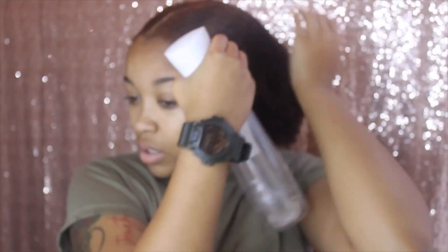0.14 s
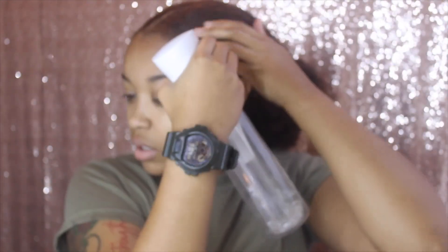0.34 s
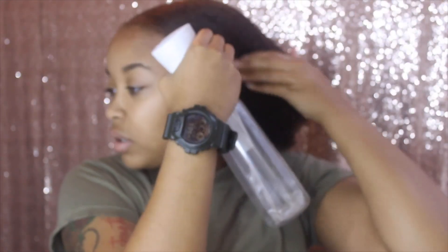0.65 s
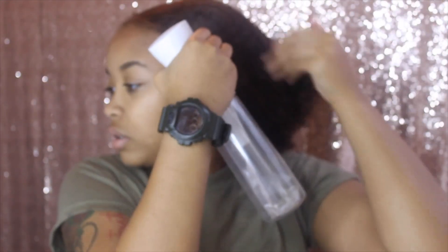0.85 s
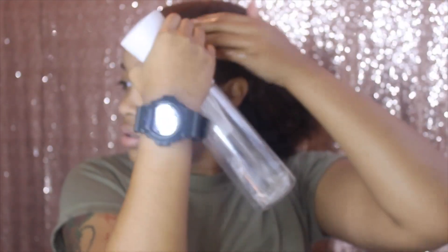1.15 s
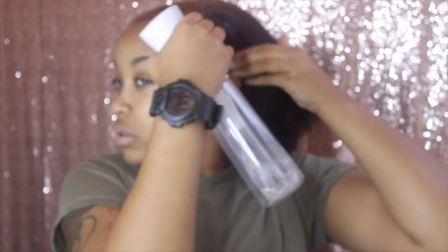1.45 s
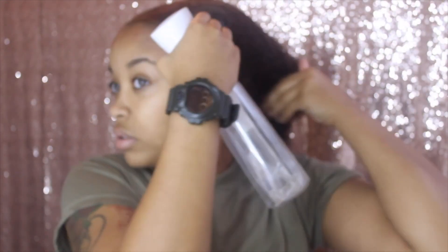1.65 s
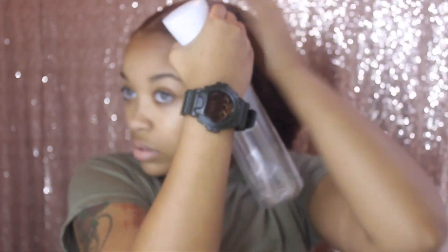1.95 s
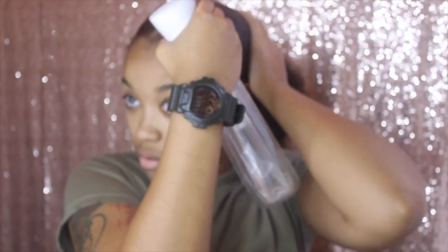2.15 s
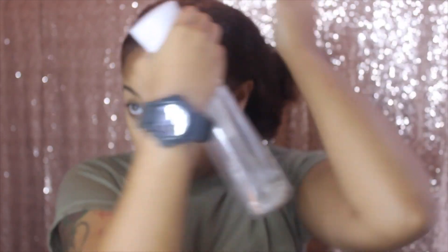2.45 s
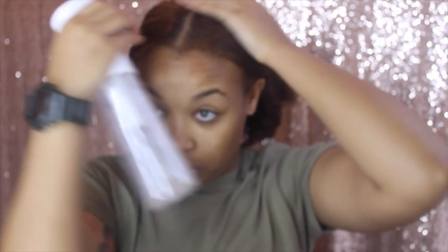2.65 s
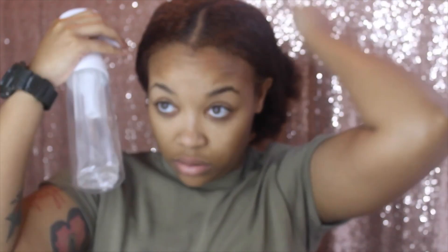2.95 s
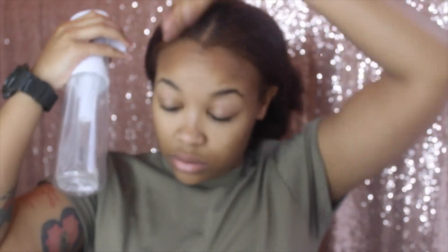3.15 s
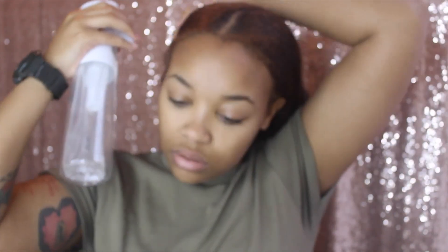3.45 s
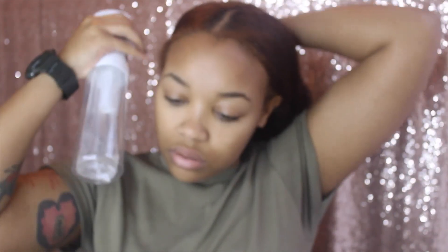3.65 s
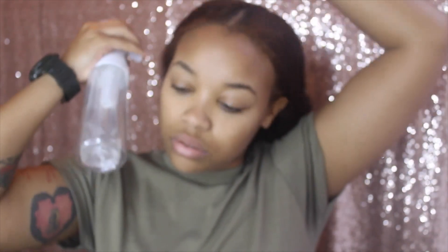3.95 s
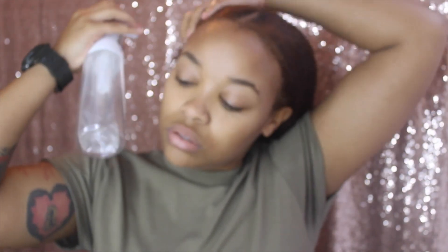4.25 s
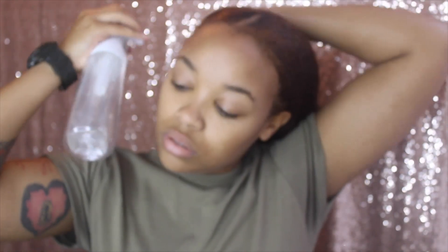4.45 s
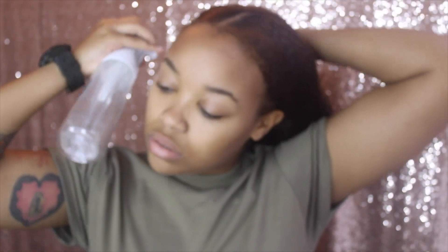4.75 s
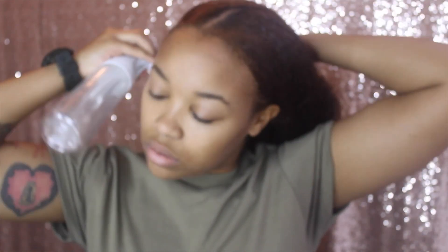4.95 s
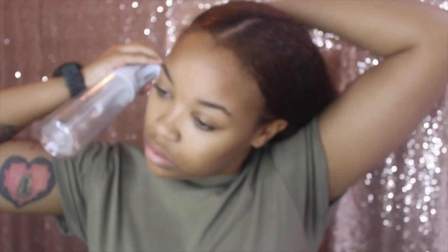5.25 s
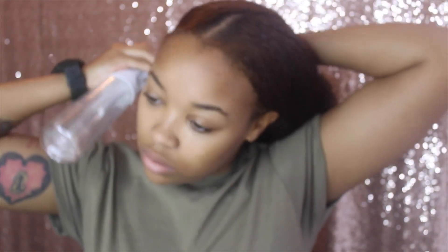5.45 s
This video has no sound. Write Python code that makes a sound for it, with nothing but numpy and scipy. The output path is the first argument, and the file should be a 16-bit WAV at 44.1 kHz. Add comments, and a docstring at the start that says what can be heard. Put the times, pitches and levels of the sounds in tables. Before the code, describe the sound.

Close mono pickup of a hand-pumped spray bottle indoors. Breathy, bright mist comes in short bursts, with one long burst early on, separated by brief gaps. Crisp plastic clicks with a small hollow bottle ring lead into the sprays, and tiny creaks come before one snap midway. Short room reflections follow, over a soft, unsteady fan hum and airy rush.

```python
"""Pump bottle misting hair

A plastic pump bottle sprays bursts of mist in a small room, over the steady hum of a fan.
Plastic trigger snaps are bursts of rattling clicks, and each one knocks the bottle and makes it ring.
The mist is filtered noise that starts as the nozzle opens and hisses until the pressure is spent.
The fan is a stack of wavering sine tones in a rush of noise. Both channels carry the same sound."""
import sys
import numpy as np
from scipy import signal
from scipy.io import wavfile

SR = 44100
rng = np.random.default_rng(int(sys.argv[2]) if len(sys.argv) > 2 else 0)


def waveform_to_disk(signal):
    """Save audio, clipped to [-1, 1], as 16-bit WAV at the path in sys.argv[1]."""
    frames = np.transpose(np.atleast_2d(signal))
    scaled = np.clip(frames, -1, 1) * 32767
    samples = np.round(scaled).astype(np.int16)
    wavfile.write(sys.argv[1], SR, samples)


N = 247401
TIME = np.arange(N) / SR  # seconds

# trigger snaps, all levels relative: (time [s], level [dB], treble tilt [dB per octave],
# ring of the trigger head [Hz], weight of the knock [dB], weight of the bottle ring [dB])
SNAPS = [(0.4314, -27, 1, 6950, 1.5, -4), (.791, -31, -2, 6900, 1, 1), (1.2526, -30.5, -1, 6900, 0.5, -1),
         (1.7083, -27, 1, 5300, 3, -0.5), (2.2106, -33, 0, 5430, 0, -1.5),
         (2.7288, -26.5, 2.5, 7050, 1.5, 2.5), (3.4835, -29, -2, 6200, 1.5, -5),
         (3.9207, -24, 1, 6600, 3.5, -6), (4.4444, -29, -1.5, 6750, -3.5, -21),
         (4.8298, -24.5, 0, 6400, 2.5, -2.5), (5.4941, -26, -2, 6700, 0, -2)]


def amp(db):
    """Turns decibels into a gain."""
    return 10 ** (np.asarray(db) / 20)


def evened(x):
    """Scales a sound to an rms of 1."""
    return x / np.sqrt(np.mean(x ** 2) + 1e-20)


def read(points, hz):
    """Reads a table of (frequency, value) along a log-frequency axis."""
    f, value = np.transpose(points)
    return np.interp(np.log(hz + 1), np.log(f), value)


def add(mix, s, sound):
    """Mixes a sound in at time s, cutting off what runs past the end."""
    part = mix[round(s * SR):][:len(sound)]
    part += sound[:len(part)]


def colour(x, spectrum, peaks=(), tilt_db=0, size=8192):
    """Filters with unit energy and no pre-echo: a broad spectrum, resonances on top, and a tilt."""
    hz = np.fft.rfftfreq(size, 1 / SR)
    db = read(spectrum, hz) + tilt_db * np.log2(hz + 1)
    for centre, width, lift in peaks:
        db = db + lift / (1 + (2 * (hz - centre) / width) ** 2)
    # the phase that goes with these gains makes the filter respond as early as it can
    log_gain = np.log(amp(np.r_[db, db[-2:0:-1]]))
    response = np.exp(np.conj(signal.hilbert(log_gain)))
    taps = np.fft.ifft(response).real[:size // 2]
    return signal.oaconvolve(x, taps / np.linalg.norm(taps))[:len(x)]


def drift(rate, count=16):
    """Makes a slow random curve of rms 1 from sines of up to rate cycles a second."""
    t = TIME[::128]
    waves = np.zeros(len(t))
    for f in np.geomspace(rate / 10, rate, count):
        waves += np.sin(2 * np.pi * (f * t + rng.random())) / np.sqrt(f)
    return np.interp(TIME, t, evened(waves))


def placed(pair, s):
    """Blends an (in front, beside) pair by where the bottle is at time s."""
    # the bottle moves from in front of the face to beside the head:
    # (time [s], place [0 in front - 1 beside])
    place = [(2.45, 0), (2.75, 1)]
    in_front, beside = pair
    return in_front + (beside - in_front) * np.interp(s, *np.transpose(place))


def mist(rise=0.012, first_flow=0.49, fall=.022, flutter_db=0.53, drop_share=0.23, drops_per_s=3000,
         whistle_hz=3170, body_hz=2750, lean_size_db=3):
    """The valve cracks open, the jet builds up, and it dies quickly as the pressure runs out."""
    # bursts: (nozzle opens [s], nozzle shuts [s], relative level [dB], lift of the mid-range [dB])
    bursts = [(-.1, 0.352, -35, 0), (0.487, .654, -35, -1), (0.828, 1.079, -35, 0.5),
              (1.314, 2.22, -35, 0.5), (2.273, 2.495, -35, 0.5), (2.785, 3.054, -34, .5),
              (3.562, 3.875, -33.5, 0.5), (3.956, 4.178, -34.5, 1), (4.524, 4.747, -35, 0),
              (4.869, 5.041, -35, 0.5), (5.567, 5.7, -35, 3)]
    # broad colour of the jet: (frequency [Hz], relative level [dB per Hz])
    jet_spectrum = [(150, -10), (450, -21), (650, -13.5), (1100, -6), (1400, -8), (1850, -6), (2200, -1.5),
                    (4200, 0.5), (5400, 3), (7000, 1.5), (9000, -2.5), (11000, -11.5), (13000, -19.5),
                    (15500, -34)]
    # narrow colours of the mist: (frequency [Hz], width [Hz], lift [dB])
    jet_peaks = [(915, 118, 12), (1526, 150, 2.5), (2840, 200, -4), (3540, 780, 2)]
    # what changes with the bottle's place: (in front, beside)
    jet_tilt_db = (-0.3, 0.4)  # treble tilt [dB per octave]
    hollow_hz = (2390, 2160)  # hollow resonance [Hz]
    hollow_db = (5, 4.2)  # its lift before the lean [dB]
    whistle_db = (3.5, 6)  # lift of the nozzle's whistle before the lean [dB]
    body_db = (0.4, -0.5)  # lift between hollow resonance and whistle [dB]
    mid_hz, mid_width_hz = 2640, 1400
    sag_db_per_s = 2  # the jet weakens a little as the pressure drains

    colourings = np.zeros((2, N))
    for opens, shuts, db, mid_db in bursts:
        start = max(opens, 0)  # a burst may already be under way at time 0
        t = np.arange(start, shuts + 10 * fall, 1 / SR)
        build_up = 1 - (1 - first_flow) * np.exp((opens - t) / rise)
        die_away = np.exp(-np.maximum(t - shuts, 0) / fall)
        sag = amp(-sag_db_per_s * (t - (opens + shuts) / 2))
        flow = build_up * die_away * sag
        # turbulent air, with a fine grain where the water tears into drops
        air, drops = rng.standard_normal((2, len(t)))
        grain = evened(drops * (rng.random(len(t)) < drops_per_s / SR))
        jet = evened(air + drop_share * grain)
        # one colouring of the hiss favours the hollow resonance, the other the whistle
        for coloured, lean_db in zip(colourings, (lean_size_db, -lean_size_db)):
            hollow = (placed(hollow_hz, start), 440, placed(hollow_db, start) + lean_db)
            whistle = (whistle_hz, 290, placed(whistle_db, start) - lean_db)
            body = (body_hz, 600, placed(body_db, start))
            peaks = jet_peaks + [hollow, body, whistle, (mid_hz, mid_width_hz, mid_db)]
            hiss = colour(flow * jet, jet_spectrum, peaks, placed(jet_tilt_db, start))
            add(coloured, start, amp(db) * hiss)
    share = .5 + .5 * np.tanh(.5 * drift(18))  # wanders between the two colourings
    blend = share * colourings[0] + (1 - share) * colourings[1]
    return blend * amp(flutter_db * drift(25.03))


def trigger(after_db=-17, after_decay=0.034, gain_db=3.0, crack_decay=0.001):
    """Hard contact, brief rattle and a softer, longer piston slide, all scaling with the squeeze."""
    # the first hard contact: (frequency [Hz], relative level [dB per Hz])
    crack_spectrum = [(300, -27), (2000, 4), (6500, 6.5), (10000, 3), (12500, -8), (16000, -36)]
    # the snap of plastic: (frequency [Hz], relative level [dB per Hz])
    snap_spectrum = [(200, -17), (500, -12), (750, -8), (1100, -22), (1800, -12), (2300, -1), (4000, 1),
                     (5500, 4.5), (6900, 8.5), (8000, 1.5), (9000, 4), (10200, -18), (12500, -23),
                     (16000, -55)]
    # modes of the trigger head: (frequency [Hz], width [Hz], lift [dB])
    head = [(1424, 190, 14.5), (2210, 300, 11), (2810, 240, -16), (3070, 180, 12)]
    # what changes with the bottle's place: (in front, beside)
    rattle_s = (0.0093, 0.0055)  # decay time of the rattle [s]
    crack_db = (-3, -0.5)  # first contact, against the level in the snap table [dB]

    out, t = np.zeros(N), TIME[:SR // 5]
    for s, db, tilt_db, ring_hz, _, _ in SNAPS:
        # each contact pushes at random one way or the other
        first, contacts, slide = rng.choice([-1., 1.], (3, len(t)))
        crack = colour(first * np.exp(-t / crack_decay), crack_spectrum)
        rattle = contacts * np.exp(-t / placed(rattle_s, s))
        snap = colour(rattle, snap_spectrum, head + [(ring_hz, 400, 5)], tilt_db)
        after = colour(slide * np.exp(-t / after_decay), snap_spectrum)
        add(out, s, amp(db + placed(crack_db, s)) * crack)
        add(out, s, amp(db + gain_db) * snap)
        add(out, s, amp(db + gain_db + after_db) * after)
    return out


def bottle(knock_db=-42, knock_decay=0.017, swell=0.0018):
    """Each snap knocks the pump and sets the hollow bottle ringing in a few dying tones."""
    # dull knock of the pump in the hand: (frequency [Hz], relative level [dB per Hz])
    knock_spectrum = [(200, -18), (400, -6.5), (510, 1.5), (630, -6), (800, -5.5), (950, -6), (1100, -9.5),
                      (1400, -6.5), (2000, -6), (8000, -58)]
    # modes of the bottle: (frequency [Hz], level before each snap's weight [dB], time to fall 60 dB [s])
    modes = [(822.5, -35, 0.058), (883, -39, 0.044), (911, -40, 0.06)]

    out, t = np.zeros(N), TIME[:SR // 5]
    for s, *_, weight_db, ring_db in SNAPS:
        thud = evened(colour(rng.standard_normal(len(t)), knock_spectrum))
        knock = thud * np.exp(-t / knock_decay)
        ring = np.zeros(len(t))
        for hz, db, t60 in modes:
            decay = np.exp(-np.log(1000) * t / t60)
            ring += amp(db) * decay * np.sin(2 * np.pi * (hz * t + rng.random()))
        onset = 1 - np.exp(-t / swell)
        add(out, s, onset * (amp(knock_db + weight_db) * knock + amp(ring_db) * ring))
    return out


def creaks():
    """Plastic slips briefly on plastic: short, fading bursts of noise as the finger takes hold."""
    # small creaks of the trigger: (time [s], level [dB], decay time [s])
    slip_times = [(3.411, -39, 0.0094), (3.435, -44, .012), (3.448, -41, 0.008)]
    # colour of a creak: (frequency [Hz], relative level [dB per Hz])
    creak_spectrum = [(400, -15), (1500, -10), (2200, -5), (2650, -24), (3150, 5), (3380, -7), (3600, -5),
                      (4100, -21), (5600, -14), (9000, -32), (15000, -43)]

    slips, t = np.zeros(N), TIME[:SR // 10]
    for s, db, decay in slip_times:
        add(slips, s, amp(db) * np.exp(-t / decay) * rng.standard_normal(len(t)))
    return colour(slips, creak_spectrum)


def faint_tone():
    """A thin sine of steady pitch swells and fades under one burst."""
    # one tone: (starts [s], ends [s], frequency [Hz], level at its peak [dB])
    tone = (3.57, 3.82, 451, -56)
    starts, ends, hz, db = tone
    arch = np.sin(np.pi * np.clip((TIME - starts) / (ends - starts), 0, 1))
    return amp(db) * arch * np.sin(2 * np.pi * hz * TIME)


def fan(wander=0.0016, waver_db=1.08, hum_db=-1):
    """The turning fan hums at wavering multiples of its turning rate, in a rush of air."""
    # hum: (multiple of the turning rate, rms level before hum_db [dB], share of the swell it follows)
    partials = [(5, -53, 0), (6, -45.5, 0.88), (7, -56, 0), (8, -49.5, 0.18), (9, -49.5, 0),
                (10, -55.5, 0.35), (12, -58, 0.32), (14, -63.5, 0.16), (15, -49.5, 0), (16, -53.5, 0),
                (17, -61.5, 0)]
    # the swelling and sinking of the hum, of which only the change counts: (time [s], level [dB])
    swell_points = [(0.0, -42.5), (0.15, -46), (0.3, -36.5), (0.55, -47), (1.05, -48.5), (1.26, -41),
                    (1.6, -50.5), (2.3, -48), (2.9, -49), (3.15, -39), (3.55, -49.5), (4.05, -39),
                    (4.55, -39), (4.78, -48), (5.61, -46)]
    # rush of air and room noise: (frequency [Hz], relative level [dB per Hz])
    air_spectrum = [(20, -31.5), (50, -9), (80, -10.5), (110, -5), (145, -10), (185, -5), (220, -14),
                    (320, -16.5), (380, -19.5), (700, -25), (2000, -28), (6000, -34), (10000, -42.5),
                    (15500, -55)]
    # room modes lifted by the fan: (frequency [Hz], width [Hz], lift [dB])
    air_peaks = [(100.6, 22, 7.5), (128.1, 7.4, 10.5), (322.3, 9.8, 18.5)]
    fan_hz, air_db = 19.56, -46.5  # average turns a second, level of the rush

    turns = np.cumsum(fan_hz * (1 + wander * drift(1.974))) / SR
    swell_db = np.interp(TIME, *np.transpose(swell_points))
    swell_db = swell_db - swell_db.mean()
    hum = np.zeros(N)
    for k, db, share in partials:
        # each partial starts at a random phase and drifts slowly, so the hum beats irregularly
        phase = 2 * np.pi * rng.random() + drift(2)
        level = amp(db + share * swell_db + waver_db * drift(5))
        hum += level * np.sin(2 * np.pi * k * turns + phase)
    rush = colour(rng.standard_normal(N), air_spectrum, air_peaks)
    # the root of 2 turns rms levels into the heights of sines
    return np.sqrt(2) * amp(hum_db) * hum + amp(air_db) * rush


def room(x, gap=.004, size=16):
    """Walls send back sparse reflections of random sign, each band dying at its own speed."""
    # room decay: (frequency [Hz], time to fall 60 dB [s])
    decay_times = [(300, 0.22), (1000, 0.62), (3000, 0.45), (7000, 0.35), (14000, 0.33)]
    taps = np.zeros(SR // 2)
    # one reflection at a random spot in every 16 samples, after a short gap
    at = np.arange(round(gap * SR), len(taps) - size, size)
    taps[at + rng.integers(0, size, len(at))] = rng.choice([-1, 1], len(at))
    hz, t, bands = signal.stft(taps, SR, nperseg=256)
    fade = np.exp(-np.log(1000) * t / read(decay_times, hz)[:, None])
    tail = signal.istft(bands * fade, SR)[1]
    return signal.fftconvolve(x, tail / np.linalg.norm(tail))[:N]


def scene(mist_db=-2, mist_room_db=-6, snap_room_db=-7, body_room_db=-3):
    """Adds up the mist, the plastic, the ringing bottle, their echo in the room, and the fan."""
    spray = amp(mist_db) * mist()
    plastic = trigger() + creaks()
    body = bottle()
    # the low ring of the bottle spreads all round, so more of it comes back from the walls
    echo = room(amp(mist_room_db) * spray + amp(snap_room_db) * plastic + amp(body_room_db) * body)
    mono = spray + plastic + body + echo + fan() + faint_tone()
    return np.array([mono, mono])


def record(dry):
    """Limits the band with a low-pass filter that takes away the highest treble."""
    edge_hz = 15600
    taps = signal.firwin(301, edge_hz, window=("kaiser", 9), fs=SR)
    return signal.oaconvolve(dry, taps[None], "same")


dry = scene()
out = record(dry)
waveform_to_disk(out)
```